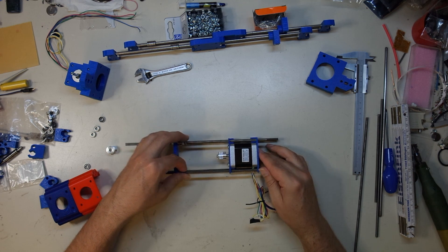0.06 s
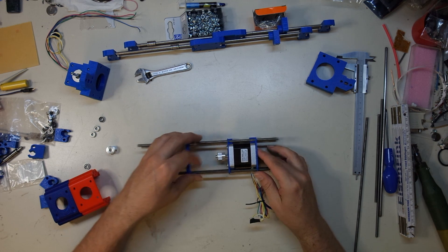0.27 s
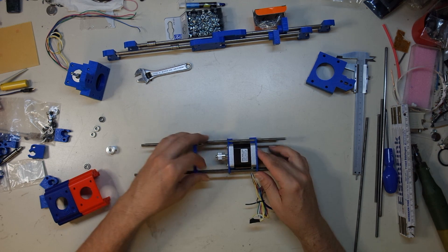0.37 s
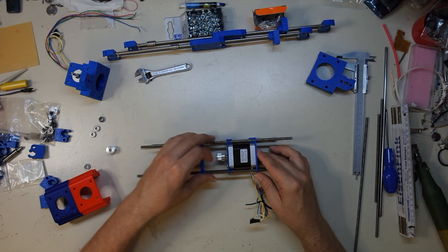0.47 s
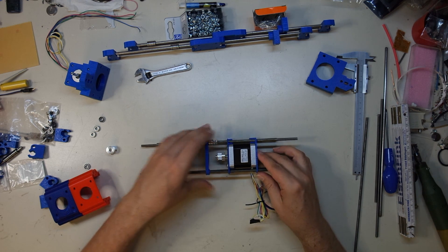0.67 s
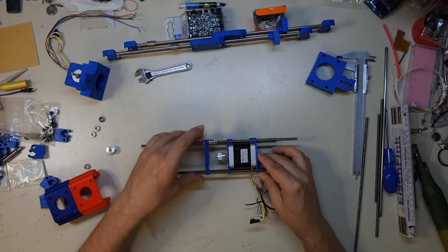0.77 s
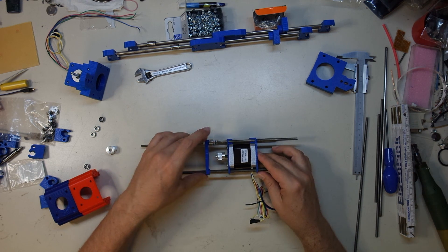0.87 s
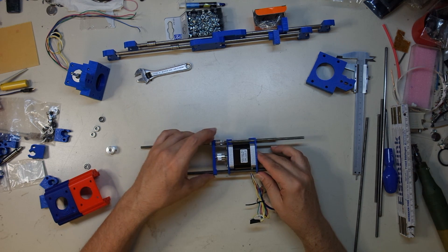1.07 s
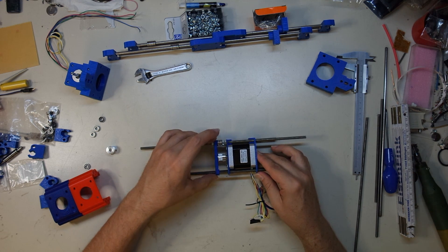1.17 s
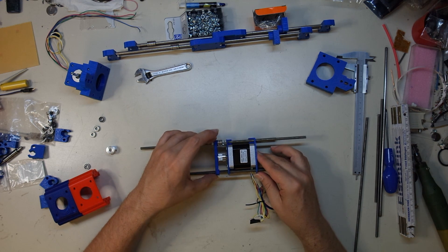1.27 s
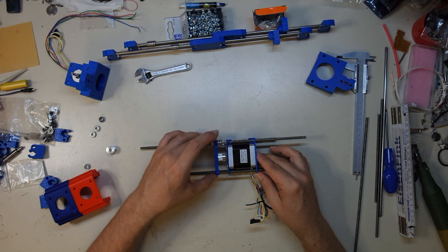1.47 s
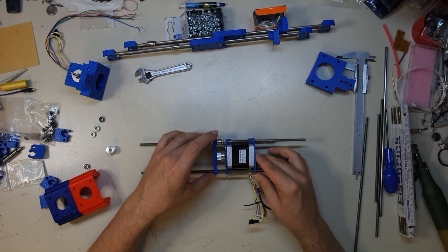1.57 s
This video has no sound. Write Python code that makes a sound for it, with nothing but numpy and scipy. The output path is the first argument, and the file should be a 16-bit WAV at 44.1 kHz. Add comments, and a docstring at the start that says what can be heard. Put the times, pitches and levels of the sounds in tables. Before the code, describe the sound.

Close by on a workbench, a carriage is pushed twice along metal rods, first louder, then more gently. Each stroke is a gritty bearing rattle with sharp clicks and light metallic ringing, in a quiet, small room.

```python
"""Motor carriage on steel rods

A carriage is pushed along two steel rods on a workbench, and after a pause pushed again.
Its ball bearings scrape and rattle, the rods ring, the plastic frame drones, bench and room boom.
Loose parts click as each stroke takes up; a small workshop answers."""
import sys
import numpy as np
from scipy import signal
from scipy.fft import rfft, irfft
from scipy.io import wavfile
from scipy.ndimage import uniform_filter1d

SR = 44100
rng = np.random.default_rng(int(sys.argv[2]) if len(sys.argv) > 2 else 0)


def master(y):
    """Save y as 16-bit WAV."""
    cut = np.clip(np.atleast_2d(y).T, -1, 1)
    pcm = np.round(cut * 32767)  # scale
    wavfile.write(sys.argv[1], SR, pcm.astype(np.int16))


N = 70560

# Stereo image, focused in the lows and wide on top: (frequency [Hz], left-right likeness [0-1])
STEREO_LIKENESS = [(2000, 0.95), (3400, 0.65), (4200, 0.23), (7500, 0.24), (9200, 0.41)]
# Bright tone of the clicks and the rods' shimmer: (frequency [Hz], level [dB])
BRIGHT_SPECTRUM = [(100, -6.5), (1700, -3), (4200, -4), (12500, 4), (16000, 0)]
BUMPS_PER_S, BUMP_SPREAD_DB = 700, 2.5  # coarse grain that drives the resonances
GRIT_PER_S, GRIT_SPREAD_DB = 5000, 3.5  # fine grain of scrape and rustle
KNOCK_T60_S = 0.016


def amp(db):
    """Decibels to gain."""
    return 10 ** (np.asarray(db) / 20)


def unit(x):
    """Scales to rms 1."""
    return x / np.sqrt(np.mean(x ** 2) + 1e-20)


def read(points, hz):
    """Reads a curve on a log-frequency axis."""
    f, value = np.transpose(points)
    return np.interp(np.log(hz + 1), np.log(f + 1), value)


def envelope(curves):
    """Gain over time from level curves, silent outside them."""
    t = np.arange(N) / SR
    return sum(amp(np.interp(t, c[:, 0], c[:, 1], left=-np.inf, right=-np.inf))
               for c in map(np.array, curves))


def colour(x, spectrum):
    """Applies an EQ curve."""
    hz = np.fft.rfftfreq(x.shape[-1], 1 / SR)
    return irfft(rfft(x) * amp(read(spectrum, hz)), x.shape[-1])


def stereo_noise(size):
    """White noise, widened by random phase offsets between the channels."""
    hz = np.fft.rfftfreq(size, 1 / SR)
    likeness = np.clip(read(STEREO_LIKENESS, hz), .02, 1)
    apart = np.sqrt(-2 * np.log(likeness)) * rng.standard_normal(len(hz))
    return irfft(np.exp(2j * np.pi * rng.random(len(hz)) + .5j * np.array([apart, -apart])), size)


def stereo_phase(hz):
    """Left and right phase offsets that give a resonance its width in the image."""
    return np.arccos(np.clip(read(STEREO_LIKENESS, hz), 0, 1)) * np.array([[.5], [-.5]])


def ring(spectrum, t60, size=2048, hump_db=3):
    """Response of a small part with dense modes; each contact point favours its own resonances."""
    humps = uniform_filter1d(rng.standard_normal(size // 2 + 1), size=12)
    humps = unit(uniform_filter1d(humps, size=8))
    noise = irfft(rfft(colour(stereo_noise(size), spectrum)) * amp(hump_db * humps))
    decay = np.exp(-np.log(1000) * np.arange(size) / SR / t60)
    return unit(noise * decay) / np.sqrt(size)


def modes(table, size=16384):
    """Stereo response of separate decaying resonances, energy 1."""
    t, response = np.arange(size) / SR, 0
    for k, (hz, width, db) in enumerate(table):
        tone = np.cos(2 * np.pi * hz * t + (-1) ** k * stereo_phase(hz))
        response = response + amp(db) * np.sqrt(width) * np.exp(-np.pi * width * t) * tone
    return unit(response) / np.sqrt(size)


def through(force, response):
    """Passes a force through a response."""
    return signal.fftconvolve(np.atleast_2d(force), response, axes=1)[:, :N]


def steady(x, size):
    """Rides the gain to hold rms 1 over a window of size samples."""
    return x / np.sqrt(abs(uniform_filter1d((x ** 2).mean(0), size)) + 1e-9)


def resonate(hz, width_hz):
    """A vibration kept up by random bumps in a steep resonance that follows hz; stereo, rms 1."""
    pole = np.exp(-np.pi * width_hz / SR)
    bumps = grit(BUMPS_PER_S, BUMP_SPREAD_DB) * np.exp(2j * np.pi * rng.random(N))
    swing = signal.lfilter([1], np.poly([pole, pole]), bumps)
    apart = stereo_phase(np.mean(hz)) * rng.choice([-1, 1])
    phase = 2 * np.pi * np.cumsum(hz * np.ones(N)) / SR + apart
    return unit((swing * np.exp(1j * phase)).real)


def drift(step_s):
    """Slow random wander about zero."""
    return np.interp(np.arange(N) / SR / step_s, np.arange(N), rng.standard_normal(N))


def grit(per_s, spread_db):
    """Random tiny impacts of uneven size."""
    strength = amp(spread_db * np.minimum(rng.exponential(1, N), 4))
    return unit(strength * rng.choice([-1, 1], N) * (rng.random(N) < per_s / SR))


def train(per_s, jitter, spread_db, count=700):
    """Nearly regular impacts."""
    gap, strength = rng.standard_normal((count, 2)).T
    onsets = (np.cumsum(np.exp(jitter * gap)) * SR / per_s).astype(int)
    return unit(np.bincount(onsets, amp(spread_db * np.clip(strength, -2, 2)), N)[:N])


def add(mix, s, sound):
    """Mixes a sound in at s seconds."""
    part = mix[:, max(round(s * SR), 0):][:, :sound.shape[1]]
    part += sound[:, :part.shape[1]]


def contacts(force, t60, count=12, handovers_per_s=14):
    """The load passes from one contact point to the next, so the colour of the impacts keeps shifting."""
    # Tone of a scraping contact: (frequency [Hz], level [dB])
    scrape_spectrum = [(100, -31), (450, -3.5), (800, -8), (1200, -2.5), (1600, -6), (6000, -1.5),
                       (12500, 1), (15500, -4.5)]
    point = (np.arange(N) / SR * handovers_per_s + rng.random(N) + rng.random(N)).astype(int) % count
    return sum(through(force * (point == k), ring(scrape_spectrum, t60)) for k in range(count))


def room_tone():
    """The workshop's quiet bed of rumble and hiss."""
    # Tone of the bed: (frequency [Hz], level [dB])
    air_spectrum = [(30, 3), (72, 12), (110, -9.5), (450, -2.5), (2200, -10.5), (4000, -20.5),
                    (15000, -21.5)]
    return amp(-49.5) * unit(colour(stereo_noise(N), air_spectrum))


def room_reverb(x, size=32768, onset_s=0.0022):
    """A short diffuse tail that dies faster in the treble."""
    # Decay of the workshop: (frequency [Hz], T60 [s])
    decay_times = [(400, 0.49), (5000, 0.32)]
    # Reverb send EQ: (frequency [Hz], level [dB])
    send_eq = [(1500, -5), (4000, -7), (14000, -13)]
    hz, t, bands = signal.stft(stereo_noise(size), SR, nperseg=256)
    t60 = read(decay_times, hz)[:, None]
    bands = bands * np.exp(-np.log(1000) * t / t60) / np.sqrt(t60) * np.minimum(t / onset_s, 1)
    tail = unit(signal.istft(bands, SR, nperseg=256)[1]) / np.sqrt(size)
    return through(colour(x, send_eq), tail)


def handling():
    """Loose parts rustle as the hands take hold, before the first push."""
    # One curve per rustle: (time [s], level [dB])
    rustles = [
        [(.001, -32.5), (.035, -41), (.09, -54)],
        [(.133, -37.5), (.16, -36), (.194, -47)],
    ]
    return contacts(grit(GRIT_PER_S, GRIT_SPREAD_DB) * envelope(rustles), KNOCK_T60_S)


def bench_and_room_boom():
    """Bumps from the rolling balls raise a low boom in the bench and long-ringing low room tones."""
    # Swell of the boom: (time [s], level [dB])
    boom_levels = [(.133, -44.5), (.29, -47), (.44, -32.5), (.53, -42.5), (.7, -37.5), (1.03, -56),
                   (1.12, -41.5), (1.36, -45), (1.58, -55)]
    # Broad boom of the bench and narrow modes of the room: (frequency [Hz], width [Hz], level [dB])
    low_modes = [(77.4, 8.7, -4), (96, 38, -7.5), (175, 8, -8.5), (386, 5.6, -11)]
    boom = through(grit(BUMPS_PER_S, BUMP_SPREAD_DB), modes(low_modes))
    return steady(boom, size=3600) * envelope([boom_levels])


def frame_drone():
    """The plastic frame drones hollowly, its note shifting as the carriage is handled and moved."""
    # One curve per stroke: (time [s], level [dB], pitch [Hz])
    drone_curves = [
        [(.001, -38, 299.1), (.09, -59.5, 280), (.155, -43, 254.9), (.195, -49.5, 281.2), (.235, -33.5, 280.5),
         (.385, -24.5, 294.1), (.42, -32, 296.6), (.495, -25, 277.9), (.61, -34, 319.4), (.695, -26.5, 303.7),
         (.81, -50.5, 300)],
        [(1.055, -47.5, 279.4), (1.095, -30, 266.1), (1.18, -44, 319.5), (1.235, -31, 320.4), (1.315, -37, 301),
         (1.36, -52, 294)],
    ]
    times, _, pitches = np.concatenate(drone_curves).T
    drone = resonate(np.interp(np.arange(N) / SR, times, pitches), width_hz=85.4)
    return steady(drone, size=1600) * envelope(drone_curves)


def rod_ring(wander=.012):
    """The balls ring the rods, whose modes wander as the carriage changes their free lengths."""
    # One curve per stroke: (time [s], level [dB])
    ring_levels = [
        [(.25, -34.5), (.375, -29.5), (.415, -33.5), (.45, -26), (.495, -32), (.54, -21.5), (.578, -29.5),
         (.608, -22.5), (.69, -40.5), (.83, -51)],
        [(1.052, -55), (1.064, -31.5), (1.098, -45), (1.125, -40.5), (1.195, -31.5), (1.26, -45)],
    ]
    # Steel rod resonances: (frequency [Hz], width [Hz], level [dB])
    rod_modes = [(1212, 38, -9), (1516, 36, -7), (1725, 85, -3.5), (1839, 140, -2.5), (2130, 150, -6),
                 (2490, 97, -5)]
    ringing = sum(amp(db) * resonate(hz * (1 + wander * drift(step_s=.08)), width)
                  for hz, width, db in rod_modes)
    return steady(ringing, size=1400) * envelope(ring_levels)


def rod_shimmer(rolling):
    """The bearings excite the dense high modes of the rods."""
    return amp(-8.5) * through(rolling, ring(BRIGHT_SPECTRUM, t60=0.11, size=4096))


def rod_clinks():
    """A rod chatters in its holder: a short, rough, damped ring."""
    # Clinks: (time [s], pitch [Hz], level [dB], T60 [s])
    hits = [(.431, 3265, -20, .07), (.79, 4330, -36, .12), (.797, 2430, -39, .14)]
    out, t = np.zeros((2, N)), np.arange(N) / SR
    for s, hz, db, t60 in hits:
        chatter = steady(resonate(hz, width_hz=110), size=600)
        add(out, s, amp(db) * chatter * np.exp(-np.log(1000) * t / t60))
    return out


def clicks(snap_t60_s=0.036, sleeve_db=-9):
    """Loose parts click: each hit is a bright snap and a ring of the bearing sleeve."""
    # Clicks: (time [s], level [dB])
    hits = [(0.0206, -25), (0.1321, -22.5), (0.1951, -16.5), (.2244, -11), (0.2763, -13), (0.297, -9.5),
            (0.3618, -8.5), (.4297, -7), (0.4572, -8.5), (.503, -11), (.606, -11.5), (0.615, -16),
            (.635, -13.5), (.671, -15), (.678, -7), (.69, -8), (0.708, -14.5), (.718, -9), (1.065, -20),
            (1.106, -15.5), (1.2134, -12), (1.234, -17.5), (1.2624, -16.5), (1.297, -17)]
    # Sleeve resonances: (frequency [Hz], width [Hz], level [dB])
    sleeve_modes = [(5850, 580, -3), (9300, 240, -6.5)]
    out, sleeve = np.zeros((2, N)), modes(sleeve_modes)
    for s, db in hits:
        gain = amp(db) * np.sqrt(SR * snap_t60_s / (2 * np.log(1000)))  # db sets the snap's attack
        add(out, s, gain * ring(BRIGHT_SPECTRUM, snap_t60_s))
        add(out, s, gain * amp(sleeve_db) * through(sleeve, ring(BRIGHT_SPECTRUM, KNOCK_T60_S)))
    return out


def bearing_judder():
    """A dry bearing judders at the height of the first push: fast slips with a thin, high ring."""
    # Swell of the judder: (time [s], level [dB])
    judder_levels = [(.285, -28.5), (.328, -16.5), (.352, -10.5), (.372, -31)]
    # Bearing resonances, applied twice: (frequency [Hz], width [Hz], level [dB])
    judder_modes = [(12300, 2000, -2), (13660, 1300, 1.5)]
    slips = contacts(train(per_s=286, jitter=0.13, spread_db=6), KNOCK_T60_S)
    response = modes(judder_modes)
    judder = through(through(slips, response), response)
    return steady(judder, size=400) * envelope([judder_levels])


def bearing_roll():
    """Balls knock round their races over a fine scrape."""
    # Drive on the bearings, one curve per stroke: (time [s], level [dB])
    strokes = [
        [(.208, -28.5), (.232, -16.5), (.25, -23), (.292, -18.5), (.345, -15.5), (.368, -16.5), (.424, -27),
         (.44, -18), (.48, -20.5), (.66, -19), (.715, -20), (.745, -28.5), (.8, -46)],
        [(1.05, -48), (1.068, -26.5), (1.098, -38), (1.118, -22.5), (1.15, -20), (1.19, -25.5), (1.295, -24.5),
         (1.375, -49.5), (1.44, -50), (1.49, -69)],
    ]
    push = envelope(strokes)
    rattle = contacts(train(per_s=130, jitter=.35, spread_db=3.5) * push, KNOCK_T60_S)
    scrape = contacts(grit(GRIT_PER_S, GRIT_SPREAD_DB) * push, t60=0.046)
    return amp(-2) * rattle + amp(-0.5) * scrape


def scene():
    """Two pushes of the carriage, with the workshop's reverb and room tone."""
    rolling = bearing_roll() + bearing_judder()
    body = rod_shimmer(rolling) + rod_ring() + frame_drone() + bench_and_room_boom()
    carriage = rolling + body + clicks() + rod_clinks() + handling()
    return carriage + room_reverb(carriage) + room_tone()


def record(dry):
    """Master chain: a slight lean to the left, low cut, soft saturation and high cut."""
    # Stereo balance: (frequency [Hz], left over right [dB])
    balance = [(80, 2.5), (1200, 1.1), (6000, 2), (13000, 1.5)]
    low_cut_hz, high_cut_hz, ceiling = 53, 15100, 1.1
    mix = np.array([colour(channel, [(hz, side * db) for hz, db in balance])
                    for channel, side in zip(dry, (.5, -.5))])
    mix = signal.sosfilt(signal.butter(2, low_cut_hz, "high", fs=SR, output="sos"), mix)
    mix = ceiling * np.tanh(mix / ceiling)
    high_cut = signal.firwin(301, high_cut_hz, window=("kaiser", 8), fs=SR)
    return signal.oaconvolve(mix, high_cut[None], "same")


dry = scene()
out = record(dry)
master(out)
```